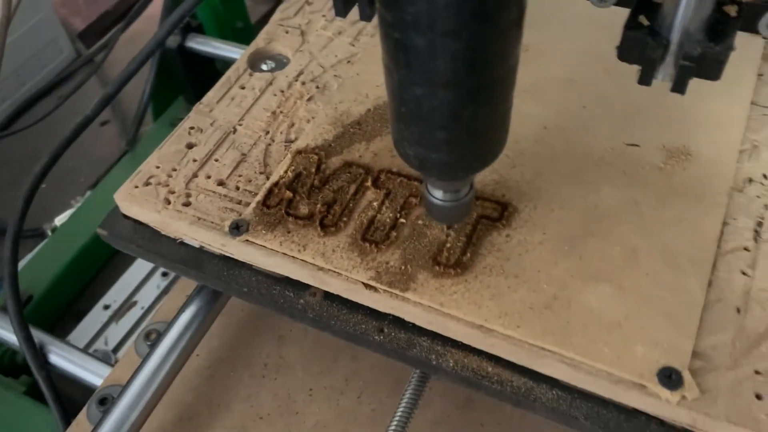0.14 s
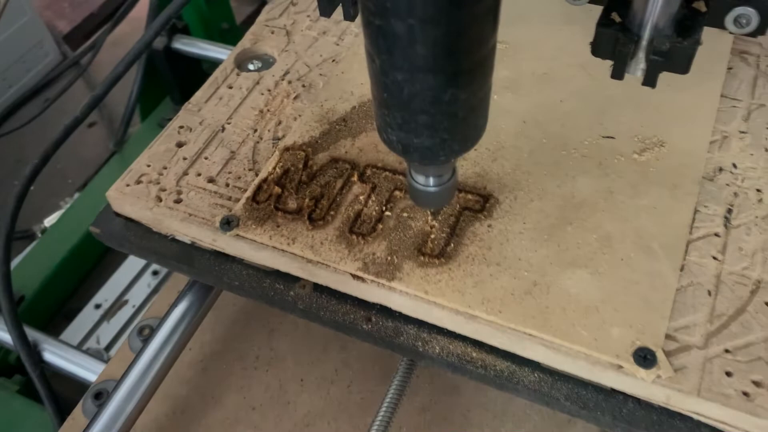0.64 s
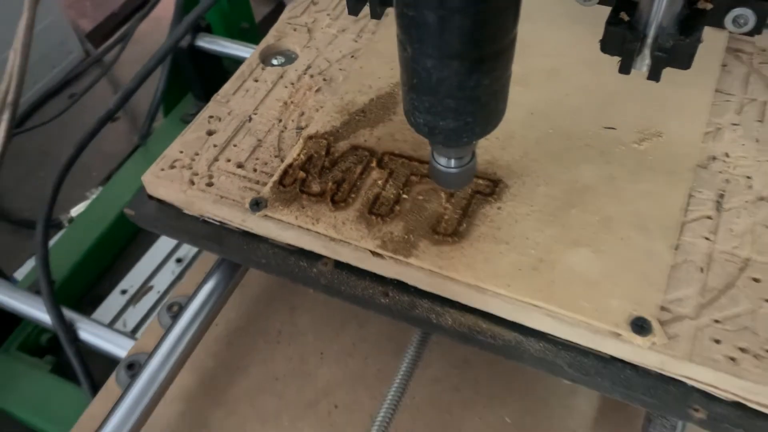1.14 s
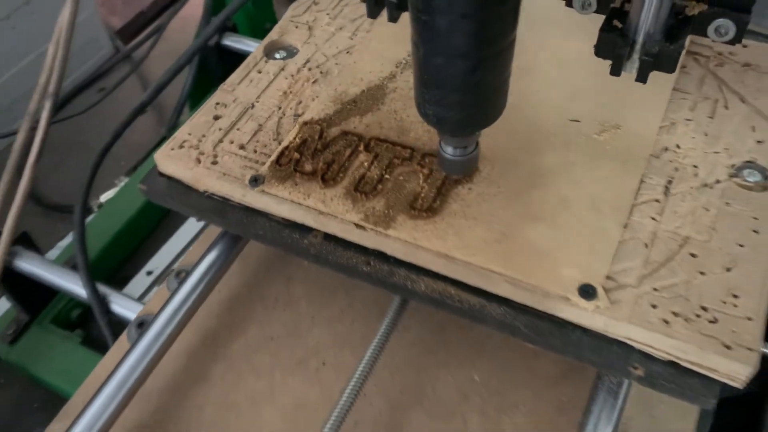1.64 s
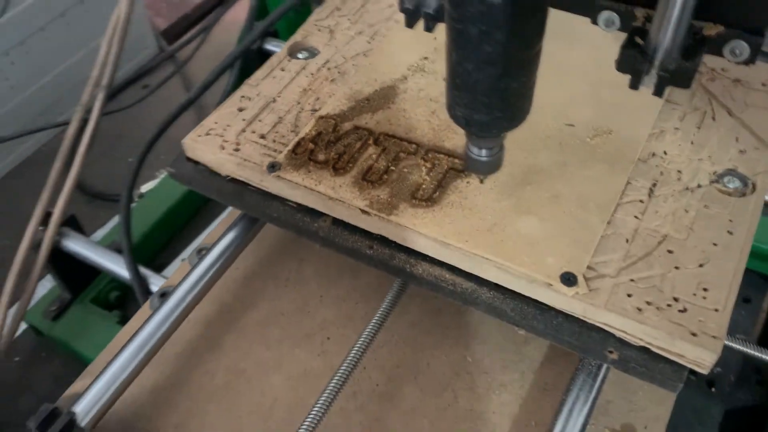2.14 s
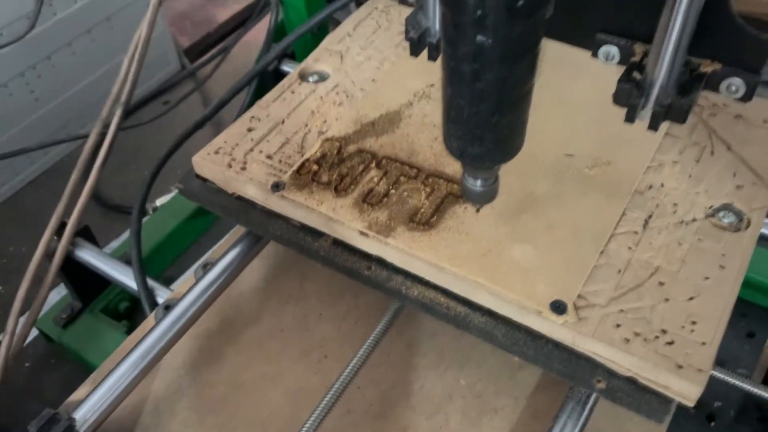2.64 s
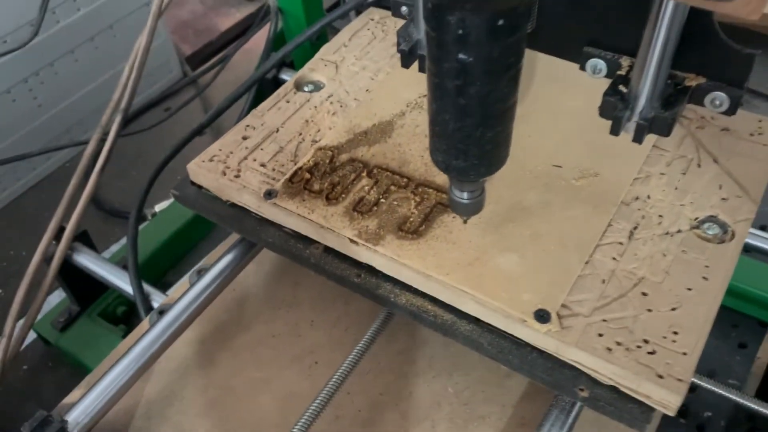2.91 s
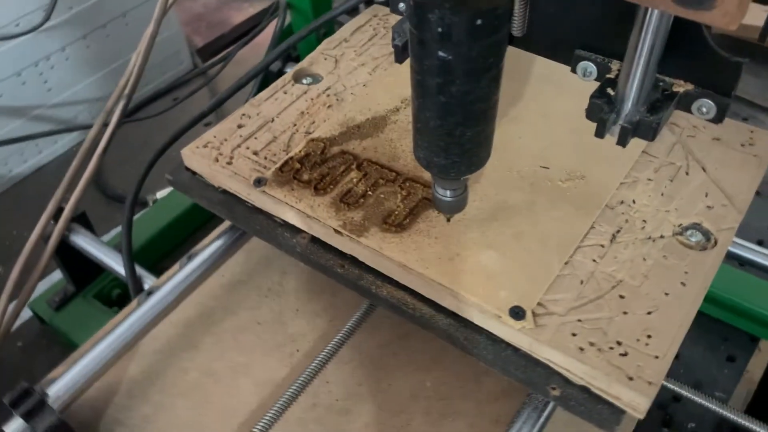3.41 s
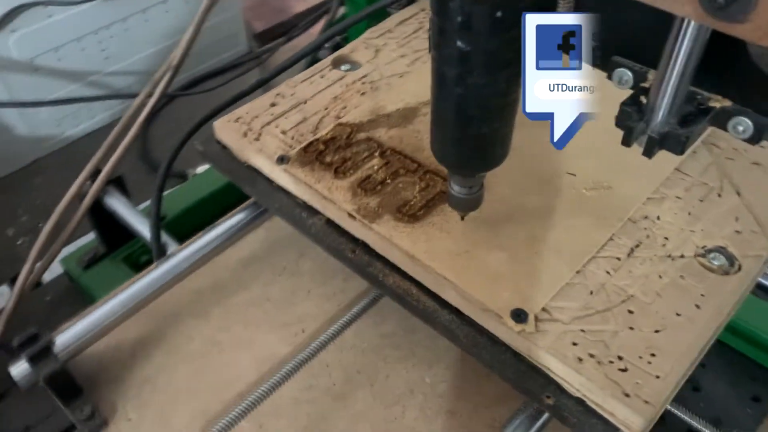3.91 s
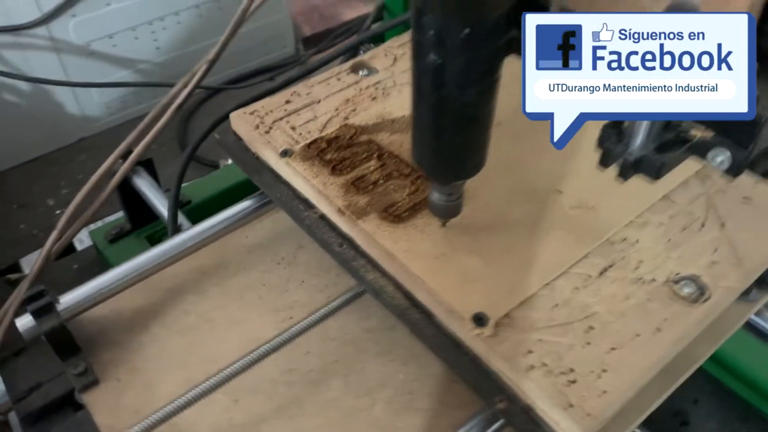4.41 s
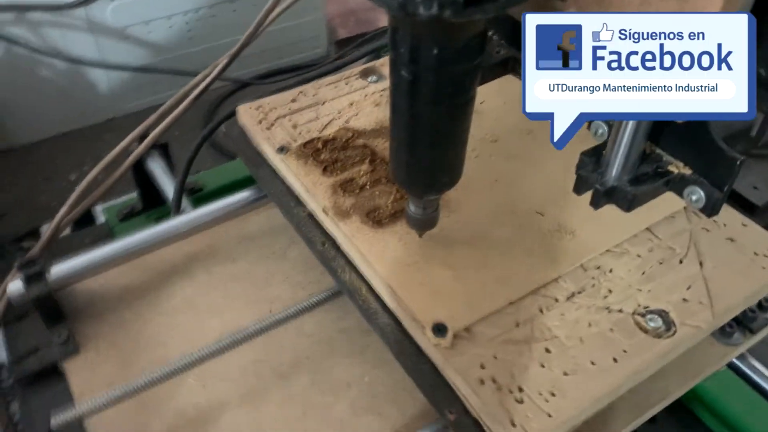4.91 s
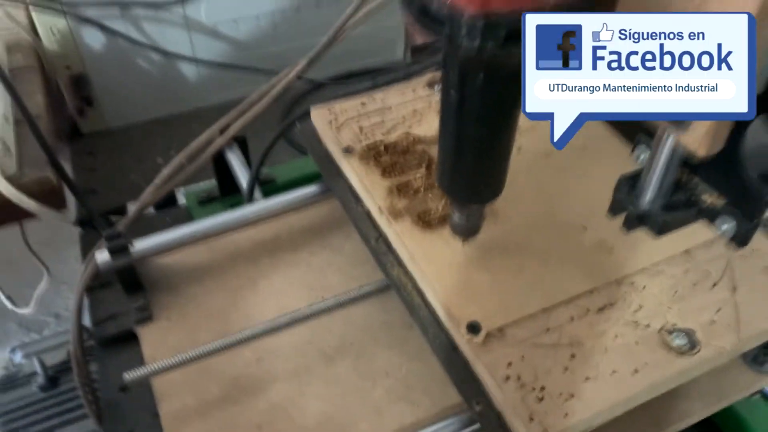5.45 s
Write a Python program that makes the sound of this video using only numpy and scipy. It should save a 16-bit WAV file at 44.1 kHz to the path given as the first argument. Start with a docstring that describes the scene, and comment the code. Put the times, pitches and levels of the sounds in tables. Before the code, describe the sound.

Close stereo sound of a spinning milling motor: a mid-pitched buzzing whine rises very slightly, then sags a little in the last second. Turbulent cooling air rushes constantly around it, with faint gantry motor hums and low table rumble beneath. Two brief treble squeaks come near two seconds, and the last stretch turns rougher with short ringing overtones. The moving microphone shifts balance and tone color; nothing starts or stops.

```python
"""A steady metallic whine: a small router spindle over a wooden board on a moving gantry, close stereo mic.
Unbalance, commutator and bearing sing as sine lines locked to one shaft angle, swelling at each ear
as spindle and hand-held mic shift among reflections. Torque ripple adds side lines; treble squeaks are brief.
Behind: drive hums as enveloped tones; fan roar, vent hiss and table rumble as shaped stereo noise."""
import sys
import numpy as np
from scipy import signal
from scipy.io import wavfile
from scipy.ndimage import uniform_filter1d

SR = 44100
rng = np.random.default_rng(int(sys.argv[2]) if len(sys.argv) > 2 else 0)


def amplitude_ratio(level_db):
    """Convert a level in decibels to the matching linear amplitude (field) ratio."""
    exponent = np.asarray(level_db, float) / 20
    return 10 ** exponent


def dump_mix(stems):
    """Bounce the given channels to the path in sys.argv[1] as a 16-bit WAV at rate SR."""
    frames = np.atleast_2d(stems).T  # one column per channel
    limited = np.clip(frames, -1, 1)  # hard clip at full scale
    pcm = np.round(limited * 32767).astype(np.int16)
    wavfile.write(sys.argv[1], SR, pcm)


N = 245195

# shaft speed: t/s, turn rate/Hz
SPEED_HZ = [(0.0, 416.67), (0.41, 420.12), (0.78, 422.52), (1.12, 424.32), (1.45, 424.41), (1.69, 423.75),
            (2.21, 424.8), (2.32, 425.59), (2.73, 426.63), (3.0, 427.01), (3.1, 426.6), (3.58, 427.95),
            (3.78, 427.9), (3.88, 428.92), (4.35, 430.05), (4.54, 429.51), (4.88, 426.66), (5.24, 424.0),
            (5.55, 421.2)]
# shaft orders 1 to 4: t/s, left level/dB, right level/dB
ORDER_1_DB = [(0, -18, -19), (.8, -16.5, -19.5), (2.1, -18.5, -20), (3.0, -19, -19), (3.8, -19.5, -20.5),
              (4.44, -19.5, -26.5), (4.65, -18, -21), (4.95, -21, -24), (5.3, -30, -34), (5.56, -33, -32)]
ORDER_2_DB = [(0, -22.5, -27), (.33, -24, -21.5), (.64, -29.5, -34), (1.0, -20, -39), (1.4, -18.5, -32),
              (1.94, -25.5, -46), (2.24, -22, -31), (2.77, -26, -29), (3.05, -19, -34), (3.65, -18, -24),
              (4.1, -18, -21), (4.4, -28, -26), (4.53, -31, -34), (4.64, -21, -21.5), (4.85, -38, -25.5),
              (5.03, -26, -27.5), (5.2, -18.5, -16.5), (5.56, -15, -13.5)]
ORDER_3_DB = [(0, -24, -21), (.28, -24, -23.5), (.63, -15, -15), (.83, -15.5, -17), (1.3, -22, -18.5),
              (1.6, -18, -17.5), (1.9, -28, -21.5), (2.5, -22, -19.5), (2.6, -17, -12.5),
              (3.29, -15.5, -15.5), (3.45, -18, -17), (3.93, -16.5, -19.5), (4.04, -14, -14.5),
              (4.5, -18, -21), (4.7, -16.5, -18), (4.87, -30, -35), (4.98, -22.5, -24.5), (5.25, -23, -29),
              (5.39, -16, -25), (5.56, -23, -30)]
ORDER_4_DB = [(0, -23, -24.5), (.46, -20, -26), (.85, -25.5, -27), (1.2, -32.5, -36), (2.54, -28, -25.5),
              (2.98, -33, -33), (3.1, -30, -30), (3.78, -33, -33), (3.9, -43, -45), (4.15, -41, -34),
              (4.3, -29, -26), (4.45, -35, -30), (4.76, -27, -27), (4.92, -30, -25), (5.1, -27, -25),
              (5.56, -27, -25)]
# flutter of orders 1 to 4 at each ear: share/0-1, rate/(knots/s)
ORDER_FLUTTER = [(0.08, 6.0), (0.17, 9.0), (0.12, 12.0), (.25, 9.0)]
# direction of the spindle seen from the mic: t/s, left lead/rad
AIM_RAD = [(0, .2), (.6, .4), (1.7, .25), (2.2, -.3), (4.4, -.4), (5.0, -.1), (5.56, -.15)]
# orders 1, 3, 4 follow that direction: lead at centre/rad, share of direction
LEAD_RULE = [(-0.0098, 1), (-0.26, .05), (-1.58, 1.7)]
# order 2 arrives mostly by reflections, its lead keeps slipping: t/s, left lead/rad
LEAD_2_RAD = [(0, -1), (.4, 1), (.8, 4), (1.1, 0.3), (2.0, -4), (2.75, -1), (3.0, -3), (4.8, -5),
              (5.15, -6), (5.56, -8.5)]
# brushes passing the commutator bars, order 30: t/s, level/dB
COMMUTATOR_DB = [(0, -27.5), (.3, -23), (.69, -31), (1.0, -31.5), (1.5, -27.5), (1.67, -37), (2.06, -31.5),
                 (2.3, -36), (2.74, -32.5), (3.1, -35), (3.45, -28), (3.74, -33), (4.12, -20.5),
                 (4.35, -19.5), (4.78, -29), (5.0, -23.5), (5.2, -26.5), (5.32, -35), (5.5, -27.5)]
# faint upper orders: order, level/dB
UPPER_DB = [(5, -34.0), (6, -37.0), (7, -37.8), (8, -41.9), (9, -41.6), (10, -43.9), (11, -45.5),
            (12, -39.8), (13, -45.6), (14, -37.6), (15, -47.5), (16, -50.2), (19, -50.9), (20, -50.4),
            (21, -52.9), (23, -53.8), (24, -50.1)]
OPPOSED_ORDER = 5  # opposite phase at the two ears in the steady upper orders
BITE_S, BITE_DB = 4.35, 2  # bit enters the wood: flicker of the upper orders, level relative to UPPER_DB
# upper orders ringing out, most of them as the bit bites: start/s, end/s, order, level/dB
RINGS_DB = [(2.75, 3.85, 14, -32.5), (4.4, 4.49, 6, -27), (4.42, 4.6, 5, -31), (4.415, 4.637, 8, -27.5),
            (4.48, 4.564, 4, -22), (4.62, 4.7, 4, -18.5), (4.602, 4.68, 7, -27), (4.61, 4.682, 9, -31),
            (4.625, 4.703, 6, -23), (4.734, 4.95, 5, -23.5), (4.82, 4.95, 7, -28), (4.87, 5.097, 6, -28.5),
            (5.0, 5.047, 7, -27), (5.07, 5.24, 10, -31), (5.11, 5.183, 7, -23), (5.3, 5.42, 5, -27),
            (5.36, 5.457, 7, -26), (5.36, 5.46, 6, -29)]
# motor torque pulses at twice the mains and splits each order, before LOAD_DB:
# order, lower line level/dB, upper line level/dB
SIDEBANDS_DB = [(2, -40.0, -39.4), (3, -45.7, -36.2), (4, -39.0, -37.8), (5, -46.8, -52.7),
                (6, -47.5, -44.9), (7, -43.6, -47.0), (8, -43.9, -50.9), (9, -47.8, -48.0),
                (10, -47.9, -49.0), (11, -51.7, -45.7), (12, -42.0, -44.9), (13, -46.6, -42.1),
                (14, -37.2, -40.6), (15, -44.0, -46.4), (16, -50.3, -55.2)]
RIPPLE_HZ = 120
# strength of the torque ripple: t/s, gain/dB
LOAD_DB = [(0, -2), (1, 3), (3, 2), (4.3, 2), (5.56, -7)]
CAGE_ORDER, BALL_PASS_ORDER = .3645, 3.915
# bearing tones, cage then ball pass: t/s, level/dB
BEARING_DB = [
    [(0, -41), (1.2, -49), (1.7, -43), (2.5, -44), (3.7, -39), (4.2, -44), (4.8, -40.5), (5.56, -42)],
    [(0, -36), (1, -33), (2.2, -51), (3, -53), (4.7, -42), (5.56, -37)],
]
# brief treble squeaks: t/s, f/Hz, half length to 1/e /s, level/dB
SQUEAKS = [(1.71, 9200, .015, -34), (2.067, 6880, 0.017, -22)]
# gantry drives while they travel: start/s, end/s, f/Hz, level/dB
DRIVES = [(1.25, 2.3, 703, -35.5), (2.3, 3.0, 197.5, -47.5), (3.05, 4.7, 224.8, -53.5),
          (4.95, 5.56, 1005, -38)]
# shape of the roar, with a steep band limit near 11.7 kHz: f/Hz, relative density/(dB per Hz)
AIR_DB = [(30, -40), (55, -12), (90, -22), (330, -19.5), (560, -10.5), (750, -4.5), (950, -8.5), (1250, -1),
          (2000, -8.5), (3100, -6.5), (5400, -11.5), (6500, -5.5), (7800, -17), (9500, -18.5),
          (10400, -17.5), (11650, -23), (11800, -83)]
# likeness of the roar at the ears: f/Hz, likeness/0-1
AIR_SAME = [(40, 1), (90, 0.96), (400, 0.54), (720, 0.86), (1200, 0.59), (2000, 0.58), (2800, 0.41),
            (4000, 0.15), (9000, 0.39), (10300, 0.68), (10900, 0.55), (11200, 0.54)]
# balance of the roar: f/Hz, left minus right/dB
AIR_BALANCE_DB = [(60, -1), (450, -1), (720, -2), (1200, 2.5), (2000, 1), (5300, 1.5), (7500, -0.5),
                  (10000, -3)]
# phase lead of roar and weak lines, simply set to opposite phase from 11.2 kHz up: f/Hz, left lead/rad
AIR_LEAD_RAD = [(500, 0.5), (760, 1.5), (1000, -0.73), (1800, 1.5), (2700, 0.5), (4700, 0.5), (5300, -4),
                (5900, 0.5), (6500, 1.5), (7300, 4), (9000, 6), (10900, 5), (11200, np.pi)]
# roar colour change when the mic faces the other side of the housing: f/Hz, gain/dB
FACING_DB = [(500, 0), (700, -2), (1100, 2.8), (1700, 0.04), (2900, -3), (4500, 0.7), (5800, 1.7),
             (6600, -3), (8000, 0.45)]
# how far it faces that side: t/s, share/0-1
FACING = [(0, 0.55), (1.4, 0.75), (2.3, 0.15), (3.5, 0), (5.56, 0)]
# air cavities of the housing: f/Hz, width/Hz, gain/dB
CAVITIES = [(1100, 60, 4), (2750, 380, 4), (3900, 570, 3), (5150, 600, 2), (5840, 720, 1.5), (7480, 740, 3)]
# vent hiss shape: f/Hz, relative density/(dB per Hz)
VENT_DB = [(7000, -90), (7900, -36), (8020, 8), (8500, 6), (9000, -2), (9700, -25), (10300, -40),
           (11000, -90)]
# table rumble shape: f/Hz, relative density/(dB per Hz)
RUMBLE_DB = [(70, -35), (130, 0), (280, -1.5), (400, -1), (520, -35), (1000, -90)]
# background: t/s, air level/dB, table rumble level/dB, vent hiss level/dB
BACKGROUND_DB = [(0, -17.5, -37.5, -35), (1.1, -18, -37.5, -32), (1.3, -18.5, -46, -31.5),
                 (2.3, -18, -51, -33), (2.55, -17, -38, -34), (2.8, -18, -56, -32),
                 (4.2, -17.5, -48, -32.5), (4.55, -17, -60, -27), (5.56, -19, -50, -27.5)]


def track(rows):
    """Columns of a table over time, one value a sample."""
    s, *columns = np.transpose(rows)
    return [np.interp(np.arange(N) / SR, s, c) for c in columns]


def read(points, hz):
    """A spectrum table read on a log frequency axis."""
    f, value = np.transpose(points)
    return np.interp(np.log(hz + 1), np.log(f + 1), value)


def evened(x):
    """Scales to rms 1."""
    return x / np.sqrt(np.mean(abs(x) ** 2) + 1e-20)


def swell(start_s, end_s, edge_s):
    """Gate with linear edges, half open at start and end."""
    t = np.arange(N) / SR
    return np.clip(np.minimum(t - start_s, end_s - t) / edge_s + .5, 0, 1)


def drift(knots_per_s):
    """Band-limited complex chance, independent at each ear, rms 1."""
    count = int(knots_per_s * N / SR) + 3
    knots = rng.standard_normal((2, count)) + 1j * rng.standard_normal((2, count))
    coarse = signal.resample(knots, N // 32 + 1, axis=1)
    at, coarse_at = np.arange(N) / 32, np.arange(N // 32 + 1)
    return evened(np.array([np.interp(at, coarse_at, ear) for ear in coarse]))


def wavering(angle, db, steady, knots_per_s, lead_rad=None):
    """Weak line: a steady direct part plus reflections that drift apart at the two ears."""
    steady = np.clip(steady, 0, 1)
    if lead_rad is None:
        mean_hz = angle[-1] / (2 * np.pi) * SR / N
        lead_rad = read(AIR_LEAD_RAD, mean_hz)
    direct = np.exp(1j * (2 * np.pi * rng.random() + lead_rad * np.array([[.5], [-.5]])))
    path = np.sqrt(steady) * direct + np.sqrt(1 - steady) * drift(knots_per_s)
    return np.sqrt(2) * amplitude_ratio(db) * (path * np.exp(1j * angle)).real


def shaft_angle():
    """Shaft angle in radians, the running integral of speed."""
    return 2 * np.pi * np.cumsum(track(SPEED_HZ)[0]) / SR


def whine(angle):
    """Strong orders 1 to 4 of the shaft, each with its own level, lead and slight flutter at each ear."""
    aim = track(AIM_RAD)[0]
    first, third, fourth = [centre + share * aim for centre, share in LEAD_RULE]
    leads = [first, track(LEAD_2_RAD)[0], third, fourth]
    out = np.zeros((2, N))
    for k, rows in enumerate([ORDER_1_DB, ORDER_2_DB, ORDER_3_DB, ORDER_4_DB]):
        share, knots_per_s = ORDER_FLUTTER[k]
        phase = (k + 1) * angle + 2 * np.pi * rng.random() + np.outer([.5, -.5], leads[k])
        flutter = 1 + share * drift(knots_per_s)
        out += amplitude_ratio(np.array(track(rows))) * (flutter * np.exp(1j * phase)).real
    return np.sqrt(2) * out


def commutator(angle):
    """Brushes meet 30 bars a turn and bounce a little, shaking the tone's level."""
    chatter = 1 + 0.19 * drift(400.0)[0].real
    left_lead_rad = np.array([[1.15], [0]])
    return np.sqrt(2) * amplitude_ratio(track(COMMUTATOR_DB)[0]) * chatter * np.cos(30 * angle + left_lead_rad)


def upper_orders(angle):
    """Faint shaft harmonics; they flicker once the bit enters the wood, and some ring out for a moment."""
    out = np.zeros((2, N))
    flicker = np.zeros((2, N))
    for k, db in UPPER_DB:
        lead_rad = np.pi if k == OPPOSED_ORDER else None
        out += wavering(k * angle, db, 0.55, 3.7, lead_rad)
        flicker += wavering(k * angle, db + BITE_DB, 0, 25.0)
    out += swell(BITE_S, N / SR + 1, .1) * flicker
    for start_s, end_s, k, db in RINGS_DB:
        out += swell(start_s, end_s, 0.045) * wavering(round(k) * angle, db, 0.78, 20.0)
    return out


def torque_ripple(angle):
    """Pulsing torque hangs a line RIPPLE_HZ below and above each order."""
    load_db = track(LOAD_DB)[0]
    ripple = 2 * np.pi * RIPPLE_HZ * np.arange(N) / SR
    out = np.zeros((2, N))
    for k, lower_db, upper_db in SIDEBANDS_DB:
        out += wavering(k * angle - ripple, lower_db + load_db, 0.65, 3.0)
        out += wavering(k * angle + ripple, upper_db + load_db, 0.29, 3.0)
    return out


def bearing(angle):
    """Cage and balls turn at fixed ratios to the shaft; the low cage tone sits near the middle."""
    cage_db, ball_db = [track(rows)[0] for rows in BEARING_DB]
    ear_gain = amplitude_ratio(np.array([[-1.2], [1.2]]))
    cage = wavering(CAGE_ORDER * angle, cage_db, 0.85, 15.0, lead_rad=0.37) * ear_gain
    return cage + wavering(BALL_PASS_ORDER * angle, ball_db, 0.94, 3.3)


def squeaks():
    """Brief bright squeaks: Gaussian puffs of narrow-band noise."""
    t = np.arange(N) / SR
    out = np.zeros((2, N))
    for s, hz, length_s, db in SQUEAKS:
        out += np.exp(-((t - s) / length_s) ** 2) * wavering(2 * np.pi * hz * t, db, 0, 150.0)
    return out


def drives():
    """Hums of the gantry motors at fixed frequencies while they travel."""
    t = np.arange(N) / SR
    out = np.zeros((2, N))
    for start_s, end_s, hz, db in DRIVES:
        out += swell(start_s, end_s, .08) * wavering(2 * np.pi * hz * t, db, 0.68, 14.0, lead_rad=0)
    return out


def noise(db, same, balance_db, lead_rad, patchy_db):
    """Stereo noise, rms 1, from random short-time spectra with faint drifting patches."""
    hz, s = np.fft.rfftfreq(2048, 1 / SR), np.arange(N // 512 + 5) * 512 / SR
    a, b, c, d, patches, gusts = rng.standard_normal((len(s), len(hz), 6)).T
    # wide, brief: unsteady flow
    gusts = evened(uniform_filter1d(uniform_filter1d(gusts, size=30, axis=0), size=10, axis=1))
    # narrow, slow: reflections off a near board
    patches = evened(uniform_filter1d(uniform_filter1d(patches, size=7, axis=0), size=50, axis=1))
    same = np.clip(same(hz), -1, 1)[:, None]
    left, other = a + 1j * b, c + 1j * d
    right = same * left * np.exp(-1j * lead_rad(hz))[:, None] + np.sqrt(1 - same ** 2) * other
    level_db = db(hz[:, None], s) + patchy_db * (patches + 0.77 * gusts)
    ear_db = np.outer([.5, -.5], balance_db(hz))[:, :, None]
    z = np.array([left, right]) * amplitude_ratio(level_db + ear_db)
    return evened(signal.istft(z, nperseg=2048, noverlap=1536)[1][:, :N])


def housing(hz):
    """Air cavities of the housing lift a few bands of the roar, in dB."""
    return sum(db / (1 + (2 * (hz - f) / width) ** 4) for f, width, db in CAVITIES)


def fan_roar(angle):
    """Turbulent cooling air, pulsed a little by each turn and by the torque ripple."""
    ripple = 2 * np.pi * RIPPLE_HZ * np.arange(N) / SR
    pulse = 1 + 0.075 * np.cos(angle) + 0.037 * np.cos(ripple)

    def colour_db(hz, s):
        facing = np.interp(s, *np.transpose(FACING))
        return read(AIR_DB, hz) + housing(hz) + read(FACING_DB, hz) * facing

    return pulse * noise(colour_db, lambda hz: read(AIR_SAME, hz), lambda hz: read(AIR_BALANCE_DB, hz),
                         lambda hz: read(AIR_LEAD_RAD, hz), patchy_db=1.63)


def vent_hiss():
    """Narrow treble hiss of air leaving a vent nearer the right ear."""
    return noise(lambda hz, s: read(VENT_DB, hz), lambda hz: 0 * hz + 0.66, lambda hz: 0 * hz - 14,
                 lambda hz: 0 * hz + 2.2, patchy_db=1.5)


def table_rumble():
    """Low noise of the table, nearly central."""
    return noise(lambda hz, s: read(RUMBLE_DB, hz), lambda hz: 0 * hz + 0.74, lambda hz: 0 * hz - .4,
                 lambda hz: 0 * hz, patchy_db=1.5)


def background(angle):
    """Roar, hiss and rumble at their levels over time."""
    air_db, rumble_db, vent_db = track(BACKGROUND_DB)
    return amplitude_ratio(air_db) * fan_roar(angle) + amplitude_ratio(vent_db) * vent_hiss() + amplitude_ratio(rumble_db) * table_rumble()


def scene():
    """Spindle lines, squeaks and drives over air and rumble."""
    angle = shaft_angle()
    spindle = whine(angle) + commutator(angle) + upper_orders(angle) + torque_ripple(angle) + bearing(angle)
    return spindle + squeaks() + drives() + background(angle)


def band_limit(x):
    """A steep low-pass at the top of the band."""
    return signal.sosfilt(signal.butter(12, 14970, fs=SR, output="sos"), x)


def record(dry):
    """Turns the finished mix into the output."""
    return band_limit(dry)


dry = scene()
out = record(dry)
dump_mix(out)
```